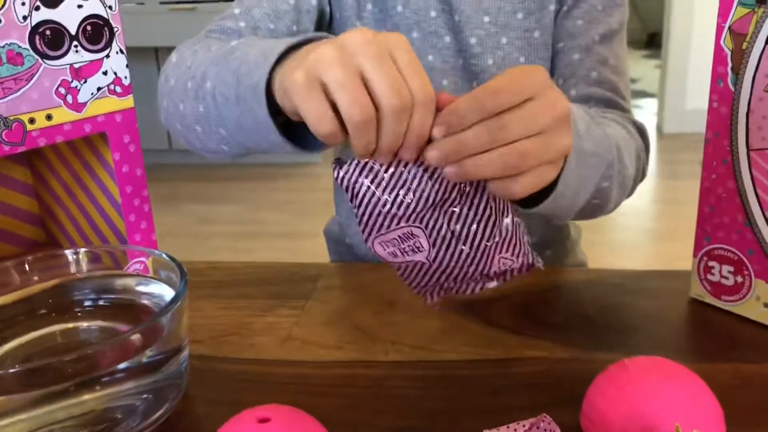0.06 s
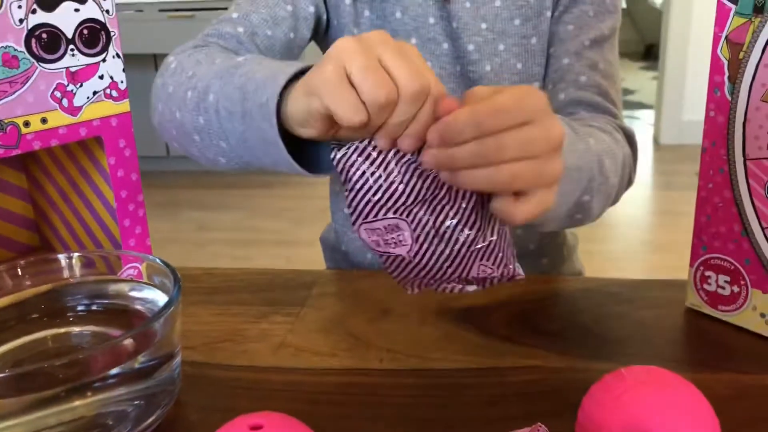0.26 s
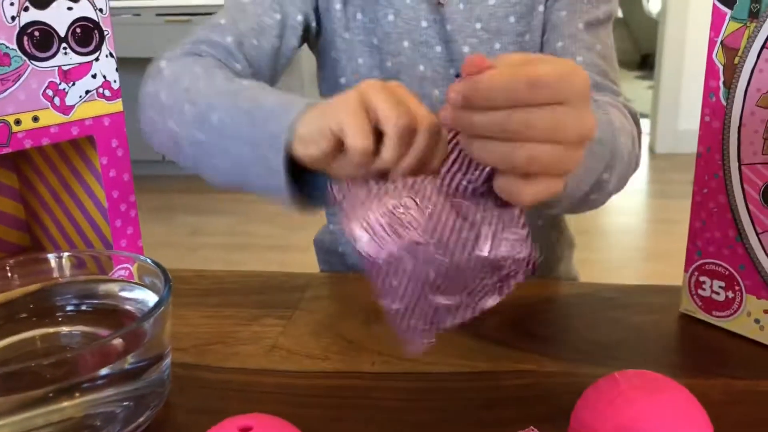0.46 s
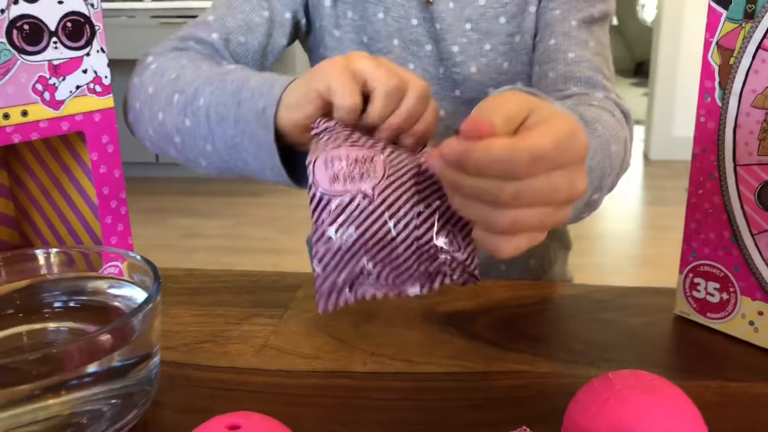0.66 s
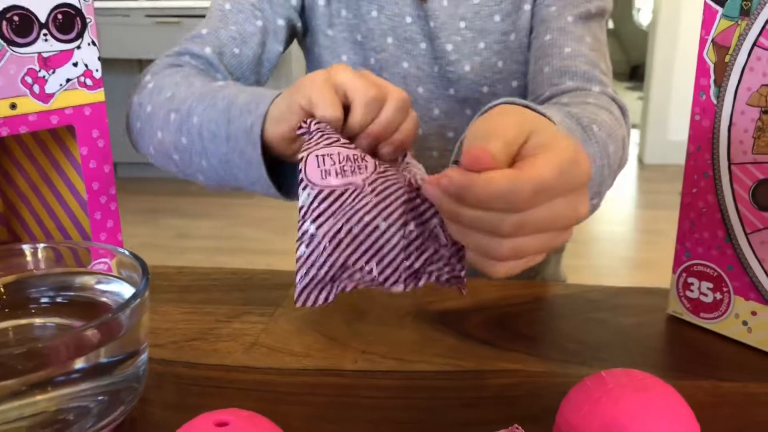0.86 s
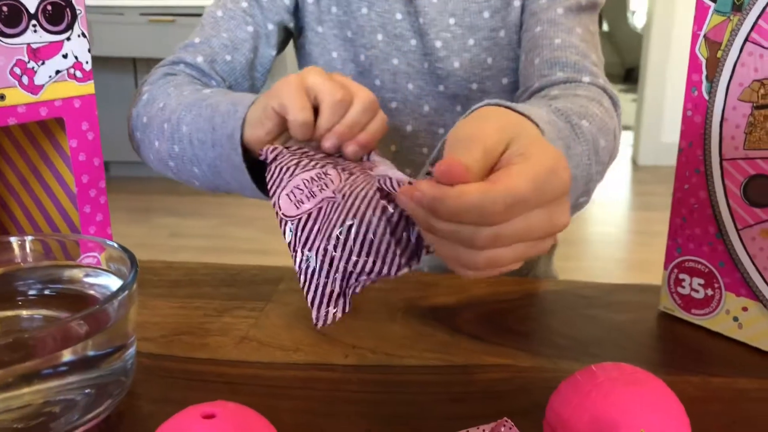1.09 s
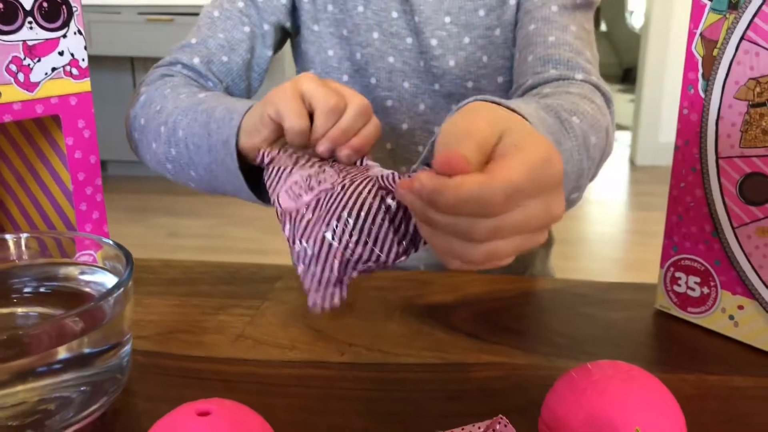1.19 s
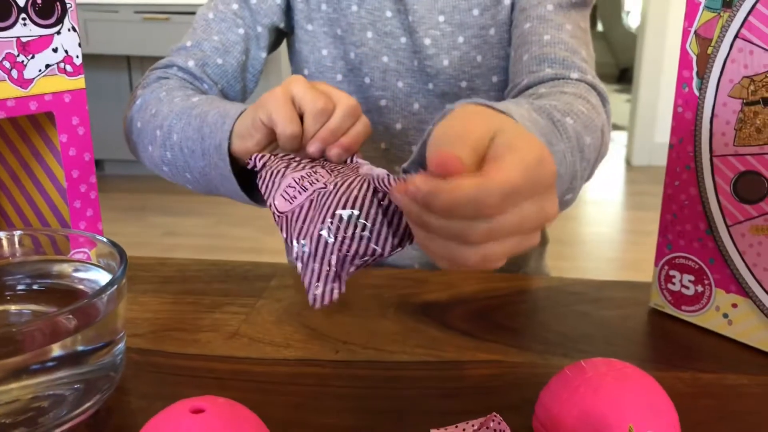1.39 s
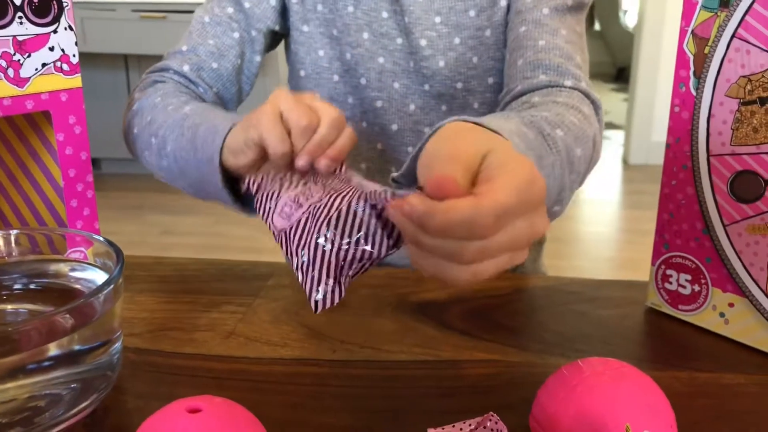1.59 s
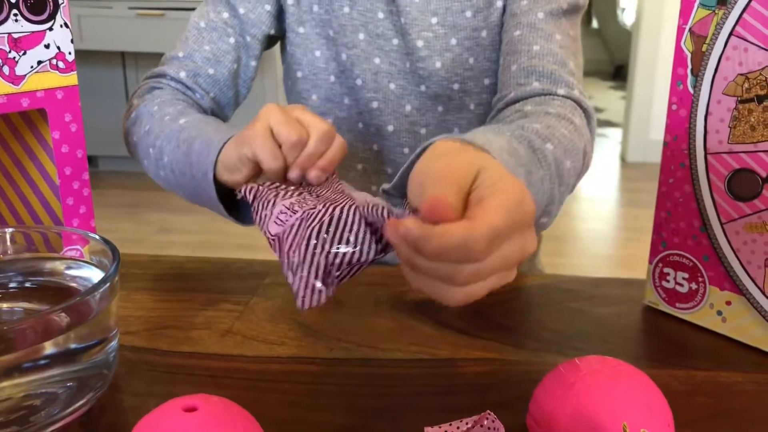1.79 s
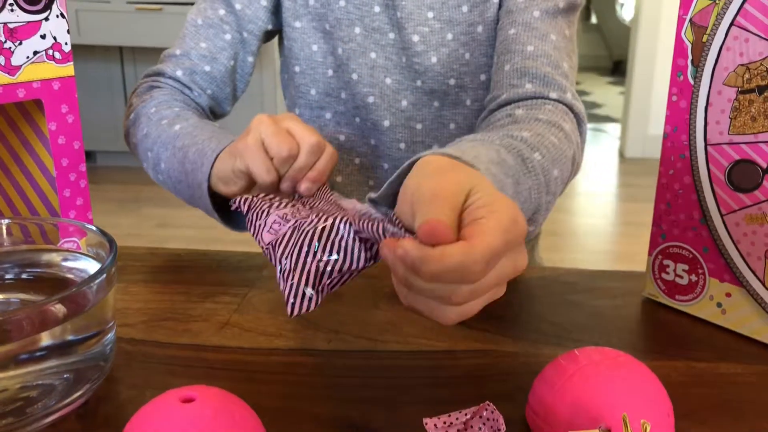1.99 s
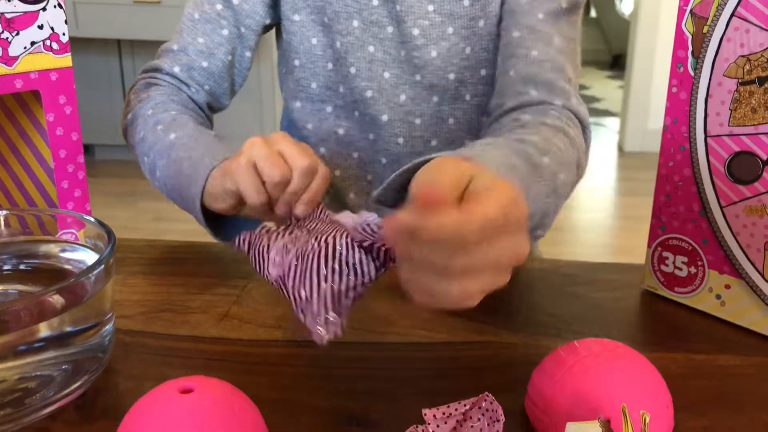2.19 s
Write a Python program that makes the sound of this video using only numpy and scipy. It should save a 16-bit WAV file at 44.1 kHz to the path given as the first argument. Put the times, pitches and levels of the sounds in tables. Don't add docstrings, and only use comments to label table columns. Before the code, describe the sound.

Crinkly plastic film snaps and rips open by hand, close up, over a faint low appliance hum

```python
import sys
import numpy as np
from scipy import signal
from scipy.fft import rfft, irfft, next_fast_len
from scipy.io import wavfile
from scipy.ndimage import uniform_filter1d

SR = 44100
rng = np.random.default_rng(int(sys.argv[2]) if len(sys.argv) > 2 else 0)


def materialize(psi):
    bounded = np.clip(np.atleast_2d(psi).T, -1, 1)
    quanta = np.round(bounded * 32767).astype(np.int16)
    wavfile.write(sys.argv[1], SR, quanta)


def volts(x):
    e = np.asarray(x, float) / 20
    return 10 ** e


N = 99225


def unit(x):
    return x / np.sqrt(np.mean(x ** 2) + 1e-20)


def along(points, hz):
    f, value = np.transpose(points)
    return np.interp(np.log(hz + 1), np.log(f + 1), value)


def filtered(x, response):
    size = next_fast_len(N + SR // 2)
    return irfft(rfft(x, size) * response(np.fft.rfftfreq(size, 1 / SR)), size)[..., :N]


def peaks_at(peaks, f):
    shape = 0
    for k, (centre, width, db) in enumerate(peaks):
        mode = 1j * f * width / (centre * centre - f * f + 1j * f * width)
        shape = shape + (-1) ** k * volts(db) * mode
    return shape / np.sqrt(np.mean(abs(shape) ** 2, -1, keepdims=True))


def placed(when, rows):
    at = np.round(when * SR).astype(int)[:, None] + np.arange(rows.shape[1])
    return np.bincount(at.ravel(), rows.ravel(), N + rows.shape[1])[:N]


def matched(layer, shape):
    energy = np.linalg.norm(shape, axis=-1, keepdims=True)
    return layer * energy / np.linalg.norm(layer, axis=1, keepdims=True)


def background():
    # f/Hz, width/Hz, level/dB
    hum_modes = [(125.3, 5, -1), (167, 13.2, 0), (256, 15.1, 0.5)]
    # f/Hz, level/dB per Hz
    air_density = [(25, -30), (45, -9.5), (100, 8.5), (280, -13.5), (400, -7), (6000, -19), (11000, -31.5),
                   (16000, -30)]
    hum = filtered(rng.standard_normal(N), lambda hz: peaks_at(hum_modes, hz))
    air = unit(filtered(rng.standard_normal(N), lambda hz: volts(along(air_density, hz))))
    return volts(-50) * hum + volts(-53.5) * air


def room(x):
    # f/Hz, t60/s
    decay = [(300, 0.69), (3000, 0.098), (14000, 0.035)]
    out = np.zeros(N)
    for part in range(3):
        hz, t, z = signal.stft(rng.standard_normal(SR // 2), SR, nperseg=256)
        tail = signal.istft(z * volts(-60 * t / along(decay, hz)[:, None]), SR, nperseg=256)[1]
        mine = np.arange(N) // 2205 % 3 == part
        delayed = np.pad(x * mine, (200, 0))
        out += signal.fftconvolve(delayed, tail / np.linalg.norm(tail))[:N]
    return out


def jolt():
    start_s, pitch_hz, t60_s, level_db = .338, 110, 0.055, -31
    t = np.clip(np.arange(N) / SR - start_s, 0, None)
    return volts(level_db - 60 * t / t60_s) * np.sin(2 * np.pi * pitch_hz * t) * (1 - np.exp(-t / 0.002))


def flexes():
    # t/s, level/dB, f/Hz
    flex_events = [(0.28, -34.5, 430), (0.3245, -28.5, 463), (0.367, -26.5, 444), (0.3848, -29, 467),
                   (0.7737, -36, 740), (0.8264, -38, 700.0), (1.2041, -32, 520), (1.329, -39.5, 547),
                   (1.8198, -37, 380), (0.668, -45, 600), (0.698, -40.5, 497), (0.885, -37.5, 450),
                   (2.012, -37.5, 473), (1.034, -39, 1200), (1.661, -44.5, 610), (1.7, -39.5, 1176),
                   (1.798, -48, 1110), (0.232, -43.5, 480), (1.992, -40.5, 875)]
    rise_s, t60_s, gain_db = 0.00049, 0.022, 5.5
    s, db, hz = np.transpose(flex_events)[..., None]
    t = np.arange(2048) / SR
    shape = (1 - np.exp(-t / rise_s)) * volts(-60 * t / t60_s)
    push = rng.standard_normal((len(s), len(t))) * shape
    octave_above = peaks_at([(2 * hz, 3.6 * hz, 0)], np.fft.rfftfreq(len(t), 1 / SR))
    rough = matched(irfft(rfft(push) * octave_above ** 2), shape)
    thump = np.sin(2 * np.pi * hz * t) * shape
    return placed(s[:, 0], volts(db + gain_db) * (thump + .8 * rough))


FACET_HZ = 4500


def coloured(when, db, edge_db):
    draw = rng.standard_normal((len(when), 2))
    facet_hz = np.clip(FACET_HZ * np.exp(0.21 * draw[:, 0]), 2600, 9000)
    return np.transpose([when, db, facet_hz, edge_db + 2.14 * draw[:, 1]])


def scattered(curve, count, spread_db, edge_db):
    s, db = np.transpose(curve)
    draw = rng.random((count, 2))
    when = s[0] + (s[-1] - s[0]) * (np.arange(count) + 2 * draw[:, 0]) / (count + 1)
    size_db = np.interp(when, s, db) - spread_db * (1 + np.log(np.maximum(draw[:, 1], .25)))
    return coloured(when, size_db, edge_db)


def snaps(rows):
    # f/Hz, width/Hz, level/dB
    edge_modes = [(8200, 15200, 5), (15300, 6500, 2)]
    # f/Hz, width/Hz, level/dB
    body_modes = [(700, 1450, -2.5), (1930, 460, 3)]
    # f/Hz, width/Hz, level/dB
    skirt_modes = [(3000, 2660, 2.5), (6000, 3660, 2.5)]
    layer_gain = [3, 5.5]
    snap_t60_s = [0.0098, 0.006, 0.019]
    facet_q, rise_s, spike_t60_s, shiver_t60_s = 1.84, 0.00039, 0.0013, 0.054
    skirt_db, shiver_db, click_db = -4, -27.5, 5
    s, db, hz, edge_db = np.transpose(rows)[..., None]
    t, f = np.arange(1536) / SR, np.fft.rfftfreq(1536, 1 / SR)
    own = rng.standard_normal((len(s), 3, 1))

    facet = peaks_at([(hz, hz / facet_q, 0)], f) ** 2 / np.sqrt(2 * facet_q)
    facet = facet + volts(skirt_db) * peaks_at(skirt_modes, f) ** 2
    edge = []
    for k, (centre, width, gain) in enumerate(edge_modes):
        edge.append((np.minimum(centre * np.exp(.07 * own[:, k]), 16000), width * 0.59, gain))
    colours = [facet, peaks_at(edge, f) ** 2, peaks_at(body_modes, f) ** 2]

    body_db = -13 - 2 * np.log2(hz / FACET_HZ) + 3 * own[:, 2]
    levels_db = [layer_gain[0], layer_gain[1] + edge_db, body_db]
    spike_db = -2.5 + np.clip(edge_db + (db + 27.5) / 2, -10, 12)
    noise = rng.standard_normal((len(s), 3, len(t)))
    noise[..., 12] += volts(click_db + spike_db) * np.sign(noise[:, :1, 0])

    total = 0
    for k, t60 in enumerate(snap_t60_s):
        shape = volts(spike_db - 60 * t / spike_t60_s) + volts(-60 * t / t60)
        shape = shape + volts(shiver_db - 60 * t / shiver_t60_s)
        shape = shape * (1 - np.exp(-t / rise_s))
        layer = irfft(rfft(noise[:, k] * shape) * colours[k])
        total = total + volts(levels_db[k]) * matched(layer, shape)
    return placed(s[:, 0], volts(db) * total)


def wrapper():
    # t/s, level/dB, facet
    # f/Hz, edge crack/dB
    large_creases = [(0.0352, -30.5, 6260, 3.5), (0.0914, -27.5, 3140, 3.5), (0.1062, -29.5, 3880, -24),
                     (0.1117, -24, 5030, -2.5), (0.1632, -31.5, 4500, -4), (0.213, -23.5, 3860, -7),
                     (0.2175, -23.5, 4330, -11), (0.2307, -21, 6650, -4.5), (0.2667, -29, 7900, 6),
                     (0.2791, -24.5, 6700, -1), (0.4111, -21, 3970, -21), (0.4368, -22, 3000.0, -2),
                     (0.4446, -25.5, 4500.0, -0.5), (0.4549, -23.5, 5980, -9), (0.623, -29.5, 3700, -4),
                     (0.6368, -21.5, 4240, -2), (0.6622, -25.5, 2220, -11), (0.6681, -22.5, 5260, 2),
                     (0.6786, -26, 3320, 3.5), (0.6962, -25.5, 1800, -10),
                     (.3219, -25, 7000, 10),
        (.3343, -18, 6700, -2),
        (.349, -19, 6600, -2),
                     (0.7451, -24.5, 7500, -8), (0.7562, -24, 2230, 1.5), (0.765, -18.5, 6740, -17),
            (0.7725, -26.5, 3530, -2), (0.7921, -23, 3440, -11), (0.8037, -19, 3270, -3),
            (0.826, -18, 5200, -3.5), (0.832, -25.5, 3000.0, 1), (0.878, -20.5, 5340, -23),
            (0.8822, -16, 4500.0, -15), (0.8854, -13, 6900, -5.5), (0.8978, -12.5, 5300, -33),
            (0.9843, -21, 5300, -20), (0.9955, -21, 4320, -9), (1.032, -23, 2880, -2),
            (1.051, -26, 3130, -5), (1.058, -43.5, 7980, 15.5), (1.0974, -29.5, 3000.0, 0),
            (1.1431, -24.5, 5170, -3.5), (1.173, -24, 6700, -13), (1.2022, -16.5, 6100, -1.5),
            (1.2184, -17.5, 3600, -6), (1.2224, -28, 4800.0, 9),
                     (1.226, -21, 3230, 0), (1.3272, -29.5, 1250, 8.5), (1.4138, -23, 3400, -1.5),
             (1.4382, -24, 5500, -28), (1.5257, -28, 3420, -16), (1.5424, -24.5, 7800, 2.5),
             (1.557, -23, 6630, -2.5), (1.5889, -28.5, 6000, 10), (1.5967, -23.5, 3100, 4.5),
             (1.623, -23.5, 3320, 4.5), (1.6624, -28.5, 6860, 8.5), (1.701, -24.5, 4900, 0.5),
             (1.738, -20.5, 3500, 0.5), (1.772, -32, 3360, 0), (1.8077, -24.5, 3250, -2),
             (1.819, -31.5, 3400, 2), (1.8613, -32.5, 6700.0, 7.5), (1.9327, -23.5, 3730, -3.5),
             (1.9655, -31, 6100, 3.5), (1.9749, -27.5, 6000, -7), (2.0375, -24.5, 6100, -11.5),
             (2.1566, -30, 6360, -4), (2.2476, -24.5, 6000.0, -7)]
    # t/s, level/dB
    early = [(0.0311, -28), (0.0223, -51), (0.0814, -31.5), (0.1206, -35), (0.1723, -44), (0.2035, -40),
             (0.2912, -31), (0.309, -35.5), (0.5542, -31.5), (0.6131, -31), (0.7114, -28.5),
             (0.8181, -23.5), (0.8399, -25.5), (0.9089, -20.5), (0.9364, -28.5), (1.0005, -26),
             (1.1129, -32.5), (1.1379, -30.5), (1.1615, -29.5)]
    # t/s, level/dB
    late = [(1.1972, -30), (1.3362, -31.5), (1.3995, -32.5), (1.455, -36.5), (1.5038, -34), (1.581, -31.5),
            (1.6082, -31.5), (1.6688, -31.5), (1.6798, -28), (1.7052, -30.5), (1.7932, -26), (1.7974, -26),
            (1.8136, -27), (1.8925, -29), (1.9202, -36), (1.9495, -36), (1.9917, -28), (2.045, -35),
            (2.058, -31.5), (2.0803, -35.5), (2.109, -40), (2.2295, -32), (2.238, -27)]
    # t/s, level/dB
    further = [(1.166, -29.5), (1.2055, -19), (1.2085, -27), (1.9701, -28), (2.084, -39)]
    # t/s, level/dB
    strain = [(0, -74), (.49, -40.5), (.58, -50.5), (.7, -40), (.85, -43), (.92, -38.5), (1.15, -52.5),
              (1.24, -36.5), (1.38, -47.5), (1.49, -68), (1.6, -65), (1.9, -43.5), (2.19, -83),
              (2.225, -48), (2.24, -25.5)]
    # t/s, level/dB
    rip_curve = [(.326, -31), (.336, -26.5), (.392, -30.5), (.402, -38), (.46, -39), (.48, -59)]
    # t/s, level/dB
    tick_events = [(0.0416, -40), (0.05, -45), (0.054, -50), (0.1877, -34), (0.316, -49), (0.658, -33),
                   (0.7947, -33), (0.813, -32.5), (0.894, -38), (1.0944, -37), (1.1072, -41), (1.1912, -39),
                   (1.2445, -34), (1.255, -36), (1.267, -35), (1.4219, -40), (1.642, -43), (1.6467, -45),
                   (1.8297, -39), (1.8675, -39)]
    # t/s, level/dB
    pop_events = [(0.017, -43.5), (0.1284, -38), (0.153, -39), (0.1921, -49), (0.197, -58), (0.2533, -32),
                  (0.503, -46), (0.5227, -36), (0.547, -33), (0.6015, -41), (0.608, -42.0), (0.63, -44),
                  (0.6984, -31), (0.726, -36), (0.8449, -40), (0.9173, -28), (1.0148, -38), (1.0213, -32),
                  (1.04, -37), (1.0848, -47), (1.1227, -37), (1.127, -34), (1.214, -24), (1.2628, -35),
                  (1.293, -37.5), (1.3113, -43), (1.393, -52), (1.4837, -42), (1.5678, -36), (1.65, -38.0),
                  (1.7196, -34.5), (1.874, -44), (1.8892, -38.0), (1.898, -33), (1.9048, -42.0),
                  (1.9413, -32), (2.0096, -37), (2.1744, -44), (2.1786, -46)]
    # t/s, level/dB, edge crack/dB
    crack_events = [(0.3256, -36, 4), (0.3304, -25.0, -8), (0.3374, -15.5, -0.5), (0.341, -20, -2.0),
                    (0.3545, -13.5, -20), (0.3602, -16.5, -8), (0.3627, -16, -11.0), (0.3671, -16.5, -1),
                    (0.3693, -19, -2), (0.3722, -19, 0.0), (0.3762, -14.5, -8), (0.3832, -18.5, -4),
                    (0.3876, -13, -8), (0.3917, -16.5, -11), (0.396, -23, -13), (0.3997, -29, -11),
                    (0.4055, -31, -8), (0.4227, -29, -2.0), (0.4228, -22.5, -11), (0.4269, -32, -11),
                    (0.429, -28, -1), (0.431, -38, -2.0), (0.4481, -23, -14), (0.46, -37.5, 2.5),
                    (0.4663, -34.0, -5.0), (0.4734, -32.5, -12)]
    small = coloured(*np.transpose(list(early) + list(late) + list(further)), -6.5)
    faint = scattered(strain, count=700, spread_db=5, edge_db=-32)
    rip = scattered(rip_curve, count=85, spread_db=3, edge_db=-3)
    ticks = coloured(*np.transpose(tick_events), 2.5)
    pops = coloured(*np.transpose(pop_events), -19)
    cracks = coloured(*np.transpose(crack_events))
    creases = snaps(np.vstack([large_creases, small, rip, faint]))
    details = snaps(np.vstack([ticks, pops, cracks]))
    return creases + details + flexes()


def scene():
    film = wrapper()
    push = filtered(jolt(), lambda hz: hz / (hz + 60))
    return (film + volts(-17) * room(film) + push + background())[None]


def band_limit(x):
    return signal.sosfilt(signal.butter(12, 17040, fs=SR, output="sos"), x)


def record(dry):
    quiet_top_hz, top_hz, sudden_db = 15900, 16800, 8
    low = filtered(dry, lambda hz: 1 / (1 + (hz / quiet_top_hz) ** 150))
    full = filtered(dry, lambda hz: 1 / (1 + (hz / top_hz) ** 150))
    power = np.diff(dry, prepend=0) ** 2
    sudden = uniform_filter1d(power, 300) > volts(sudden_db) * uniform_filter1d(power, 1500)
    mix = low + uniform_filter1d(1. * sudden, 100) * (full - low)
    return band_limit(mix)


dry = scene()
out = record(dry)
materialize(out)
```